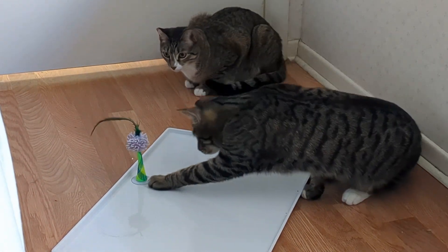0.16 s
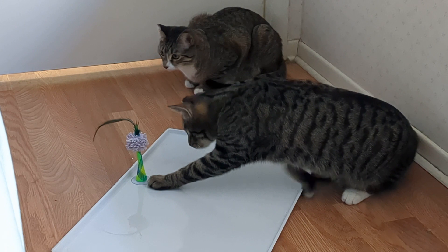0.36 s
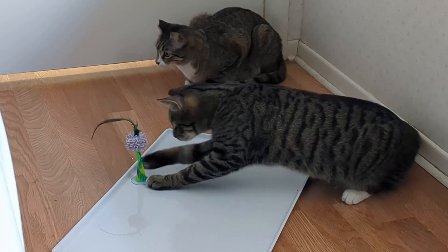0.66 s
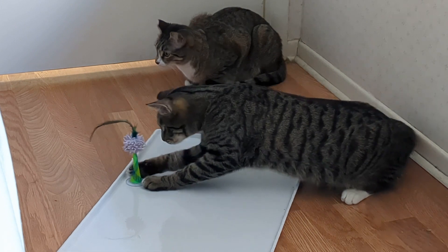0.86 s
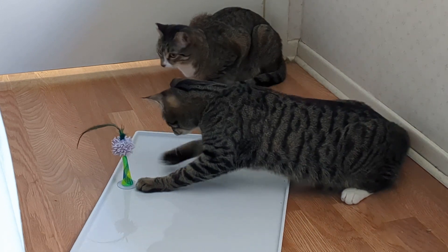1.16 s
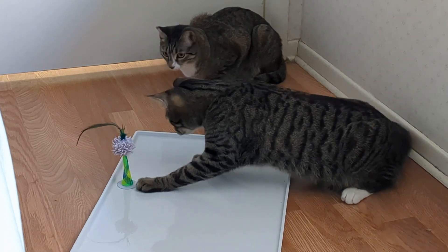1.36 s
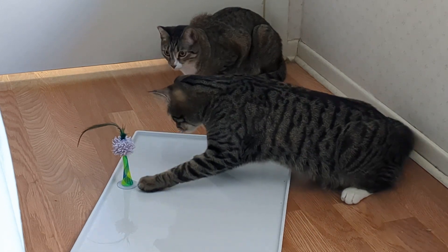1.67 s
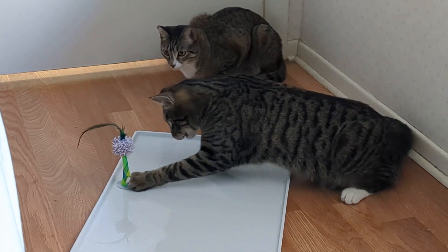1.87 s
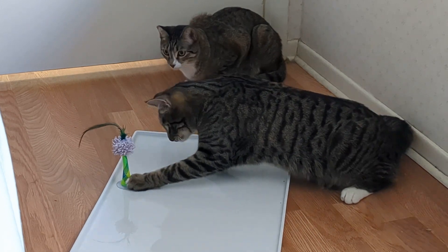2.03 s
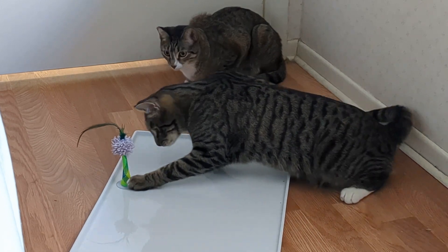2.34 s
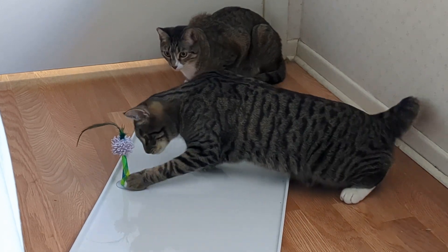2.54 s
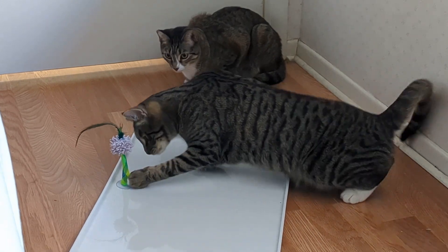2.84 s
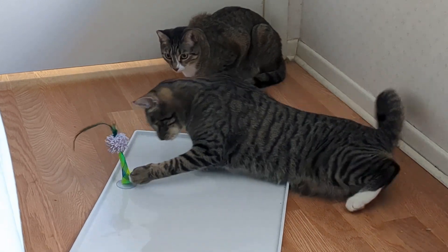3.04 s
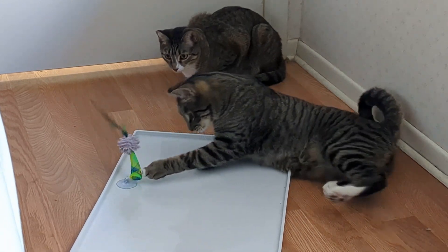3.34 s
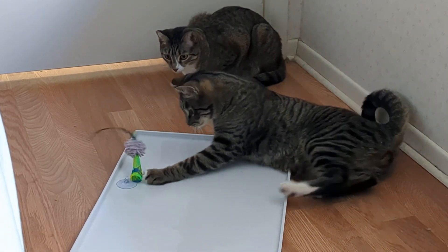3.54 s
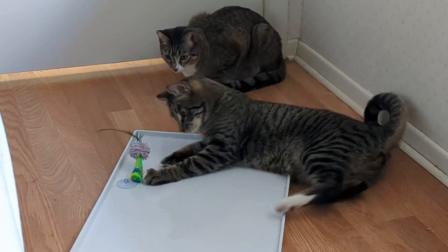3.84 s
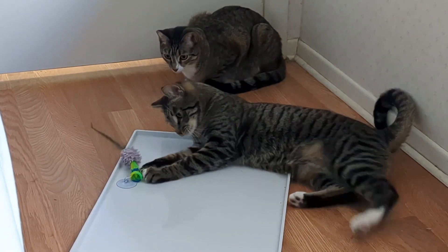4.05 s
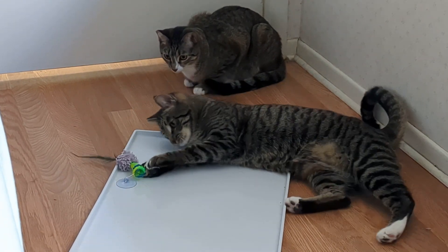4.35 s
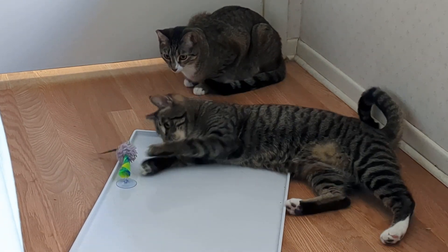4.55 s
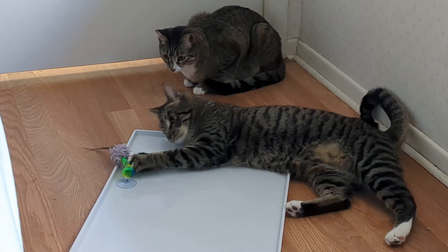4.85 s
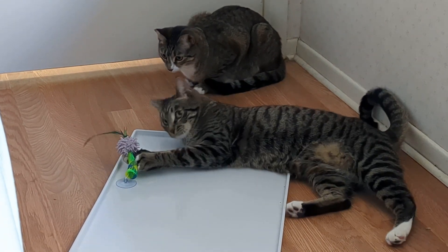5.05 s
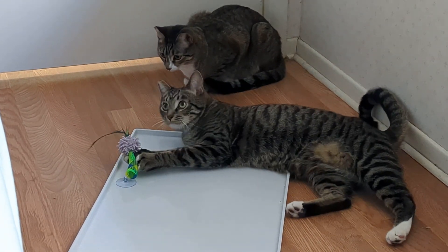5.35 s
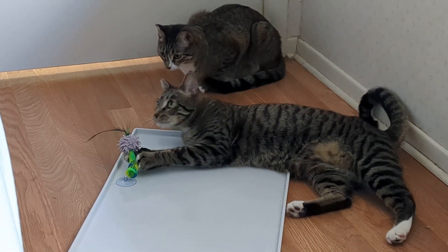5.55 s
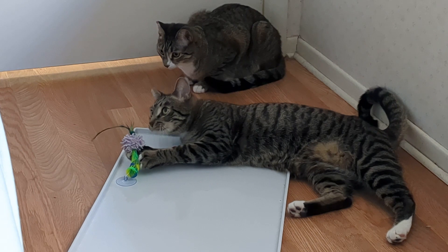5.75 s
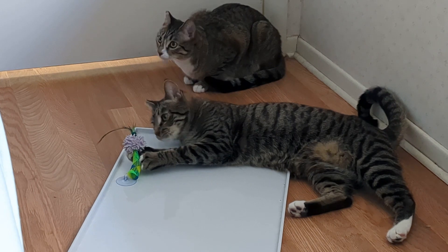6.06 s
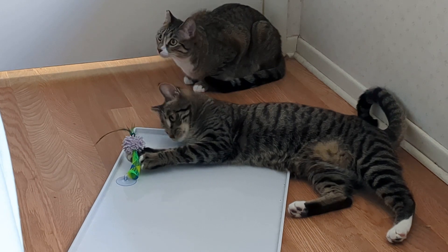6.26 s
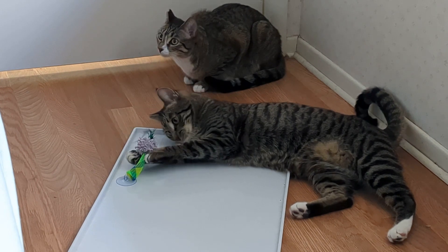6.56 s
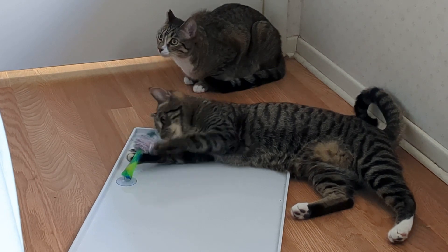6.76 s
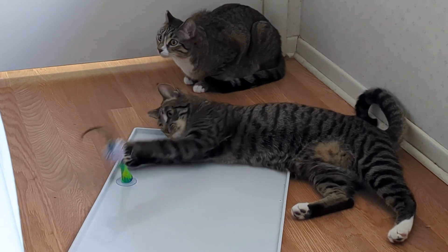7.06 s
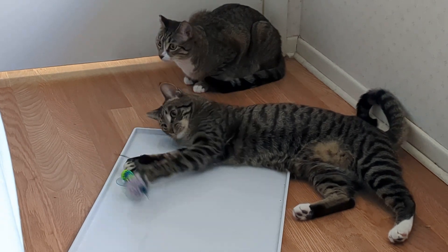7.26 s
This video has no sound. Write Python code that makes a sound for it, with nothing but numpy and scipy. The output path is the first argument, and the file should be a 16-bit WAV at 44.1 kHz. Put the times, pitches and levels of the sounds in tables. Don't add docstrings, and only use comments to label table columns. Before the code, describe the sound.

Close stereo sound of a cat playing with a springy toy on a plastic tray in a room corner. A faint distant whine passes early, then come dry ticks, a rough tray slide and one sharp clack. A lull leads to a pounce with rapid clatter and a hard snap, by far the loudest moment. Small ticks thin out into barely audible padded taps and a tiny spring ring, over steady low rumble and hiss.

```python
import sys
import numpy as np
from scipy import signal
from scipy.fft import rfft, irfft, next_fast_len
from scipy.io import wavfile
from scipy.ndimage import uniform_filter1d

SR = 44100
rng = np.random.default_rng(int(sys.argv[2]) if len(sys.argv) > 2 else 0)


def decibels_to_gain(level_db):
    exponent = np.asarray(level_db, float) / 20
    return 10 ** exponent


def generate_wav(signal):
    frames = np.transpose(np.atleast_2d(signal))
    scaled = np.clip(frames, -1, 1) * 32767
    pcm = np.round(scaled).astype(np.int16)
    wavfile.write(sys.argv[1], SR, pcm)


N = 326600


def rms_one(x):
    return x / np.sqrt(np.mean(x ** 2) + 1e-24)


def at_hz(points, hz):
    table = np.array(points)
    return np.interp(np.log(hz), np.log(table[:, 0]), table[:, 1])


def in_time(rows, column, outside):
    table = np.array(rows)
    return np.interp(np.arange(N) / SR, table[:, 0], table[:, column], outside, outside)


def band_pass(order, low_hz, high_hz, x):
    sos = signal.butter(order, [low_hz, high_hz], "band", fs=SR, output="sos")
    return signal.sosfilt(sos, x)


# t/s, peak level/dB, plate weight level/dB and edge level/dB (both relative to the peak)
REACHING = [(0.175, -41.5, -24, -24), (0.5179, -51, -18, 1), (0.5332, -38, -26, -1.5),
            (0.661, -42.5, -20.5, -8), (0.7644, -37, -8, -0.5), (0.9911, -30.5, -12.5, -7),
            (1.062, -39, -10, -31), (1.2416, -49.5, -32, -13), (1.3584, -44.5, -15.5, -10),
            (1.3912, -30.5, -17.5, -7), (1.5313, -49, -8.5, -7), (1.6597, -35, -15, -9.5),
            (1.7038, -41, -18, -7), (1.7175, -33.5, -2.5, 5.5), (1.7246, -15.5, -8.5, -7),
            (1.821, -40, -26, -5), (2.7694, -57.5, -20, -5.5)]
# t/s, peak level/dB, weight
# level/dB, edge level/dB
POUNCE = [(3.022, -30.5, -34.5, -18), (3.035, -31, -18.5, -14), (3.074, -32, -25.5, -10.5),
          (3.0797, -45.5, -16, -10), (3.1268, -40, -12, -10.5), (3.153, -42, -25.5, -10),
          (3.168, -48, -25, -7.5), (3.1785, -26, -27.5, -1.5), (3.1809, -25.5, -4, -5.5),
          (3.1984, -39, -2.5, -7.5), (3.215, -21.5, -14.5, -5), (3.2294, -37.5, -10.5, -4),
          (3.3362, -6, -10.5, -11.5), (3.3487, -8, -12, -5), (3.5113, -35.5, -13.5, -7)]
# t/s, peak level/dB, weight level/dB, edge level/dB
SETTLING = [(3.6087, -48, -15, -10), (3.6395, -36.5, -3, 2), (3.6488, -28.5, -31, -5),
            (3.678, -50, -32, -6), (3.7855, -32.5, -34, -3), (3.828, -54, -23, -11), (3.887, -52, -12, -6),
            (3.895, -39.5, -20, -8), (3.9432, -38, -18, -7.5), (4.025, -45, -22, -4),
            (4.1365, -48.5, -16, -16), (4.2051, -51.5, -20, -19), (4.2467, -51.5, -18, -18),
            (4.2803, -49, -17, -19), (4.339, -52, -19.5, -20.5), (4.3754, -43, -20, 4),
            (4.4533, -37, -6.5, 2.5), (4.4644, -45.5, -10, 5), (4.5291, -46.5, -35, -6.5),
            (4.5682, -52, -30, -5), (4.6441, -44, -16, -5.5)]


def claw_ticks():
    return contacts(REACHING + POUNCE + SETTLING, pan_db=8, wall_db=2.33, smear_s=.0016, count=14)


# t/s, peak level/dB, weight level/dB, edge level/dB
PAD_TAPS = [(5.2694, -73, -5.5, -13), (5.3562, -50, -21.5, -17), (5.6295, -55.5, -16.5, -18),
            (5.8694, -57.5, -18, -6), (5.8984, -49.5, -14, -12), (5.9055, -44, -11.5, -12),
            (6.2985, -60.5, -17, -9), (6.3394, -66, -14, -18), (6.4093, -51.5, -14, -6.5),
            (6.425, -66, -10, -14), (6.772, -42, -15, 2.5), (6.8007, -57, -12, 12), (7.2686, -65, -7, -11)]


def pad_taps():
    return contacts(PAD_TAPS, pan_db=2, wall_db=0.5, smear_s=.006, count=70)


# f/Hz, part (0 thud, 1 plate, 2 claw, 3 edge), level/dB
PARTS = [(150, 0, -29), (445, 0, -4.4), (970, 0, -5.5), (1434, 1, 0.14), (1940, 1, 8), (2600, 2, -0.67),
         (4800, 2, -5.5), (6200, 3, -1.96), (16450, 3, 3.5)]


def contacts(rows, pan_db, wall_db, smear_s, count):
    out = np.zeros((2, 2, N + 2048))
    hz = np.arange(1, 1026) * SR / 2048
    knots = np.geomspace(300, 20000, count)
    peaks_db = np.array(rows)[:, 1:2]
    longer = decibels_to_gain(0.28 * np.clip(-30 - peaks_db, -25, 20))
    delays = smear_s * rng.random((len(rows), count)) ** 2 * longer
    shadow = ear_difference(pan_db, hz)
    fade = np.hanning(4096)[2048:]
    for (s, peak_db, weight_db, edge_db), delay in zip(rows, delays):
        thud_db = -4 + weight_db - 0.68 * (peak_db + 49.5)
        parts = np.array([thud_db + 10, weight_db + 3.5, 0., edge_db - 4.5])
        spectrum = [(edge, parts[part] + db) for edge, part, db in PARTS]
        gain_db = at_hz(spectrum, hz) + tray_colour(hz)
        gain_db += 0.16 * (peak_db + 7.5) * np.maximum(np.log2(hz / 12000), 0)
        phase = 2 * np.pi * np.cumsum(np.interp(hz, knots, delay)) * hz[0]
        click = rfft(causal(gain_db + shadow)) * np.exp(-1j * phase)
        pair = irfft(click) * fade
        pair *= decibels_to_gain(peak_db) / np.abs(pair.mean(axis=0)).max()
        sends_db = np.array([0, wall_db + 0.14 * (peak_db + 12)])
        at = round(s * SR)
        out[:, :, at:at + 2048] += pair * decibels_to_gain(sends_db)[:, None, None]
    return out[:, :, :N]


# f/Hz, width f/Hz, level/dB above the slope
TRAY = [(561.6, 630, 8.5), (800, 350, 3.5), (1185, 83, 3), (1720, 200, 0.5), (2478, 120, 2.5),
        (3040, 770, 2), (4622, 800, 2.5), (6660, 1300, 7.5), (9430, 1900, 6)]


def tray_colour(hz):
    bumps = sum(db / (1 + (2 * (hz - centre) / width) ** 2) for centre, width, db in TRAY)
    return bumps - 1.5 * np.log2(hz / 3000)


# f/Hz, share of the left-right difference
SHADOW = [(700, .05), (1400, 0.13), (2400, 0.58), (4400, 2.1), (8000, 2.7), (15000, 2)]


def ear_difference(pan_db, hz):
    return np.outer([.5, -.5], pan_db * at_hz(SHADOW, hz))


def causal(gain_db):
    cepstrum = irfft(gain_db * np.log(10) / 20)
    half = cepstrum.shape[-1] // 2
    cepstrum[..., 1:half] *= 2
    cepstrum[..., half + 1:] = 0
    return irfft(np.exp(rfft(cepstrum)))


# low f/Hz, high f/Hz
DRAG_BANDS = [
    (420, 1250),
    (1300, 2200),
    (2200, 5500),
    (5500, 18000),
]


def drags():
    slips_per_s, uneven_db, pan_db = 2500.0, 7.5, 5.5
    sizes = decibels_to_gain(uneven_db * np.minimum(rng.exponential(1, (2, N)), 4))
    sizes = sizes * rng.choice([-1, 1], (2, N))
    slips = sizes * (rng.random((2, N)) < slips_per_s / SR) + 1e-18
    slow = signal.butter(2, 45, fs=SR, output="sos")
    clumps = signal.sosfilt(slow, rng.standard_normal((4, N)))
    out, levels_db = np.zeros(N), grip()
    for k, (low_hz, high_hz) in enumerate(DRAG_BANDS):
        patches_db = 0.47 * rms_one(clumps[0] + clumps[k])
        scrape = rms_one(band_pass(3, low_hz, high_hz, slips[k % 2]))
        out += decibels_to_gain(levels_db[k] - 10 + patches_db) * scrape
    hz = np.arange(1, 1026) * SR / 2048
    brighter_db = 2.2 * np.log2(hz / 3000)
    body = causal(tray_colour(hz) + brighter_db + ear_difference(pan_db, hz))
    return signal.fftconvolve(out[None], body, axes=1)[:, :N]


# full at t/s, held t/s, level/dB, weight level/dB, edge level/dB
STROKES = [(0.19, 0.0099, -54, -23.5, -5), (0.278, 0.024, -53.5, -28, 0), (0.476, .004, -65.5, -17, -7),
           (0.538, 0.009, -68, -17, -1), (1.38, 0.011, -62.5, -15, -4.5), (3.04, 0.0076, -59.5, -7, 0),
           (3.085, .01, -53.5, -17, -7), (3.13, .008, -55.5, -14, -7), (3.189, 0.032, -49, -14, 4),
           (3.657, .015, -58.5, -13, 0), (3.82, .01, -64.5, -7, 2.5), (3.95, 0.22, -78, -2, -5),
           (4.15, 0.012, -69, -12, -4.5), (4.21, .008, -75, -12, -14), (4.25, 0.0095, -74, -19, -16.5),
           (4.285, 0.0077, -82, -14, -10), (4.345, .01, -76, -12, -12), (4.385, 0.0058, -75.5, -11, 6.5),
           (4.49, 0.014, -70, -18, -4), (5.27, 0.036, -82, -17, -3), (6.33, 0.017, -82, -15, -5.5),
           (6.42, 0.0092, -80, -8, -8)]
# t/s, pressure level/dB, weight level/dB
SLIDE = [
    (0.6, -75, -12),
    (0.665, -50.5, -30),
    (0.74, -54.5, -23),
    (0.8, -50.5, -20.5),
    (0.95, -56.5, 0.5),
    (1.03, -61.5, -36),
    (1.08, -56, -12),
    (1.25, -67.5, -8.5),
    (1.32, -143, -15),
]


def grip():
    rise_db_per_s, fall_db_per_s, thud_db = 328, 230.5, -2.5
    t, weight_db = np.arange(N) / SR, in_time(SLIDE, 2, 0)
    parts = np.array([weight_db + thud_db, weight_db, 0 * t, 0 * t - 1.5])
    levels = in_time(SLIDE, 1, -150) + parts
    for s, held_s, level_db, weight_db, edge_db in STROKES:
        near = slice(max(round((s - .2) * SR), 0), round((s + held_s + .3) * SR))
        rise_db = rise_db_per_s * np.maximum(s - t[near], 0)
        fall_db = fall_db_per_s * np.maximum(t[near] - s - held_s, 0)
        parts = np.array([[weight_db + thud_db], [weight_db], [0], [edge_db]])
        levels[:, near] = np.maximum(levels[:, near], level_db - rise_db - fall_db + parts)
    return levels


# t/s, peak level/dB, f/Hz
THUMPS = [(1.728, -53, 905), (3.186, -40, 770), (3.215, -42.5, 700), (3.342, -37, 766), (3.362, -38, 620),
          (4.458, -55.5, 1110), (4.468, -59.5, 550), (5.902, -50.5, 519), (5.94, -73, 595),
          (6.795, -55, 550), (6.802, -60, 1350), (7.262, -63, 480)]
# t/s, length t/s, level/dB
CHATTER = [
    (0.995, 0.046, -55),
    (1.065, 0.061, -51),
]


def thumps():
    rise_s, t60_s, width = .004, .09, .35
    out, t = np.zeros(N + SR), np.arange(SR // 5) / SR
    puffs = rng.standard_normal((len(THUMPS), len(t)))
    puffs = puffs * (1 - np.exp(-t / rise_s)) * decibels_to_gain(-60 * t / t60_s)
    for (s, db, hz), puff in zip(THUMPS, puffs):
        body = band_pass(2, hz * (1 - width), hz * (1 + width), puff)
        at = round(s * SR)
        out[at:at + len(t)] += decibels_to_gain(db) * body / np.abs(body).max()
    rim_hz, rim_width_hz = 2700, 610
    for s, length_s, db in CHATTER:
        knocks = rng.standard_normal(len(t)) ** 3
        rattle = rms_one(band_pass(2, rim_hz - rim_width_hz / 2, rim_hz + rim_width_hz / 2, knocks))
        swell = np.sin(np.pi * np.minimum(t / length_s, 1) ** .5)
        at = round(s * SR)
        out[at:at + len(t)] += decibels_to_gain(db) * rattle * swell
    return out[:N]


# f/Hz, level/dB, time to fade by 60 dB t/s
SPRING = [
    (2490, -67, 0.13),
    (2960, -70, .07),
    (3763, -69, .045),
    (5017, -77, .05),
]


def spring():
    t = np.maximum(np.arange(N) / SR - 5.355, 0)
    out = np.zeros(N)
    for hz, db, t60_s in SPRING:
        out += decibels_to_gain(db - 60 * np.minimum(t, 1) / t60_s) * np.sin(2 * np.pi * hz * t)
    return out


# f/Hz, time to fade by 60 dB t/s, left level/dB, right level/dB
WALLS = [(400, .25, -3, -3), (800, .24, -3, -1), (1600, .27, -.5, 2.5), (3200, .27, -1, -2),
         (6400, .22, -3, -4.5), (12800, .16, -2.5, -3.5)]
# t/s, left level/dB, right level/dB
ECHOES = [(.0015, -1, -3), (.0042, -6, -10.5), (.0088, -7, 0), (0.012, -11.5, -2.5), (0.0175, -17.5, -3),
          (.026, -14.5, -9.5)]


def room(dry):
    tail_db, build_s, scatter_s = -21.0, .009, .0006
    t = np.arange(SR // 2) / SR
    tail, early = np.zeros((2, 2, len(t)))
    for hz, t60_s, left_db, right_db in WALLS:
        noise = rng.standard_normal(tail.shape)
        band = band_pass(2, hz / np.sqrt(2), min(hz * np.sqrt(2), .45 * SR), noise)
        fade = decibels_to_gain(np.array([[left_db], [right_db]]) - 60 * t / t60_s)
        tail += band / band.std() * np.sqrt(hz / SR * 2) * fade
    tail *= decibels_to_gain(tail_db) * (1 - np.exp(-(t / build_s) ** 2))
    for s, left_db, right_db in ECHOES:
        scatter = rng.standard_normal((2, 200)) * np.exp(-t[:200] / scatter_s)
        scatter /= np.sqrt(np.sum(scatter ** 2, axis=1, keepdims=True))
        at = round(s * SR)
        early[:, at:at + 200] += scatter * decibels_to_gain(np.array([[left_db], [right_db]]))
    late = signal.fftconvolve(dry.mean(axis=0, keepdims=True), tail, axes=1)
    return (late + signal.fftconvolve(dry, early, axes=1))[:, :N]


# f/Hz, level/dB per Hz
RUMBLE = [(12, -60.5), (20, -23.5), (30, -12.5), (53, -1), (109, -6), (133, -5), (163, -0.5), (189, -5.5),
          (220, -5.5), (346, -18.5), (430, -29.5), (572, -22), (699, -35.5), (787, -27.5), (1100, -48.5),
          (1430, -82.5), (2420, -120)]
# t/s, swell level/dB
STEPS = [
    (0.95, 2.5),
    (1.71, 7.5),
    (2.0, 5),
    (2.45, 1),
    (4.0, 2.5),
    (6.3, 3),
    (6.6, 4.5),
    (6.92, 2),
    (7.15, 6),
]


def rumble():
    steady = air(RUMBLE, level_db=-54) * decibels_to_gain(np.array([[.3], [-.3]]))
    low = signal.sosfiltfilt(signal.butter(3, 78, fs=SR, output="sos"), steady)
    t, step_s = np.arange(N) / SR, .09
    swell_db = sum(db * np.exp(-((t - s) / step_s) ** 2) for s, db in STEPS)
    both = steady - low + rms_one(low) * decibels_to_gain(-59.5 + swell_db)
    return signal.sosfilt(signal.butter(3, 35, "high", fs=SR, output="sos"), both)


# f/Hz, level/dB per Hz
HISS = [(650, -40), (1100, -9.5), (1460, -4.5), (1580, -10), (1790, -7), (2220, -7.5), (2400, -7),
        (3260, -8.5), (4690, -10), (5370, -16), (6740, -14.5), (8170, -23), (8850, -13.5), (9800, -23),
        (16500, -31.5)]
# t/s, level/dB
HISS_SWELL = [(0, 0.5), (1.9, 6), (2.3, 3.5), (2.7, 2), (3, 3.5), (4.6, 6), (5, 5.5), (5.2, 3), (6, 2.5),
              (7.4, 1.5)]


def hiss():
    steady = air(HISS, level_db=-79.5) * decibels_to_gain(in_time(HISS_SWELL, 1, None))
    return steady + decibels_to_gain(-0.5) * band_pass(1, 2400, 2520, steady)


# f/Hz, likeness (1 the same, 0 unrelated)
LIKENESS = [(30, 0.91), (60, 0.99), (130, 0.94), (290, 0.96), (640, 0.31), (1410, 0.015), (16000, 0)]


def air(spectrum, level_db):
    size = next_fast_len(N)
    hz = np.maximum(np.arange(size // 2 + 1) * SR / size, 1)
    alike = np.clip(at_hz(LIKENESS, hz), -.99, .99)
    mid, side = rfft(rng.standard_normal((2, size))) * decibels_to_gain(at_hz(spectrum, hz))
    pair = np.sqrt(1 + alike) * mid + np.sqrt(1 - alike) * side * [[1], [-1]]
    return decibels_to_gain(level_db) * rms_one(irfft(pair, size)[:, :N])


# t/s, f/Hz, level/dB
WHINE = [
    (0.12, 481.6, -79),
    (0.14, 500, -79),
    (0.17, 454, -71),
    (0.228, 447, -61),
    (0.298, 457, -66.5),
    (0.514, 506, -76.5),
    (0.55, 495, -79),
]


def whine():
    tone = np.sin(2 * np.pi * np.cumsum(in_time(WHINE, 1, None)) / SR)
    loudness = uniform_filter1d(decibels_to_gain(in_time(WHINE, 2, -150)), size=900)
    return np.sqrt(2) * tone * loudness


def scene():
    thump_sends = decibels_to_gain(np.array([0, -10]))[:, None, None]
    tray = claw_ticks() + pad_taps() + drags() + spring() + thumps() * thump_sends
    direct, to_walls = tray
    direct[1] = np.roll(direct[1], 6)
    return direct + room(to_walls) + rumble() + hiss() + whine()


def roll_off(x):
    return signal.sosfilt(signal.butter(12, 16650, fs=SR, output="sos"), x)


def record(dry):
    dull = signal.sosfilt(signal.cheby2(10, 40, 16200, fs=SR, output="sos"), dry)
    dull = signal.sosfilt(signal.butter(1, 14000, fs=SR, output="sos"), dull)
    return roll_off(np.tanh(dull / 0.92))


dry = scene()
out = record(dry)
generate_wav(out)
```